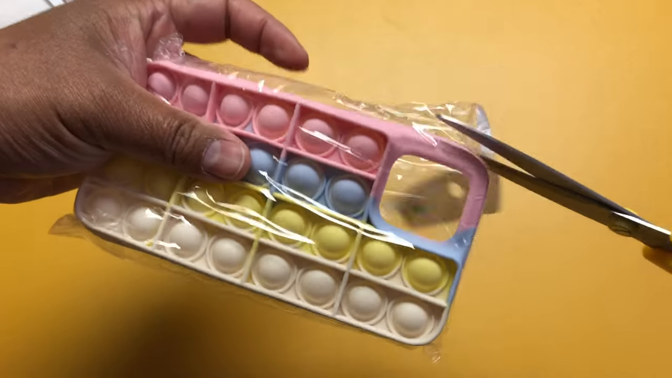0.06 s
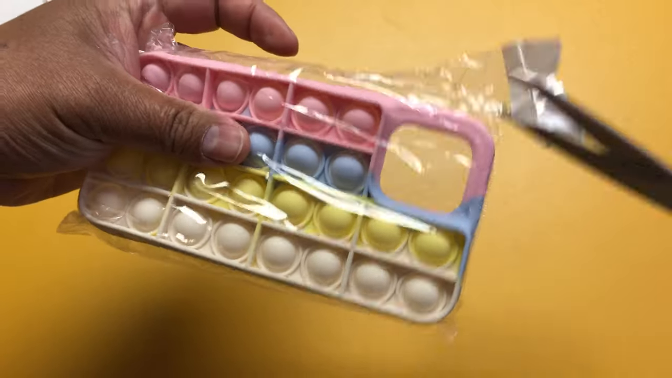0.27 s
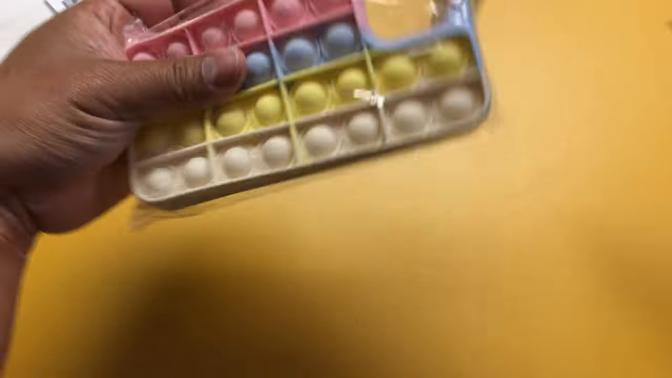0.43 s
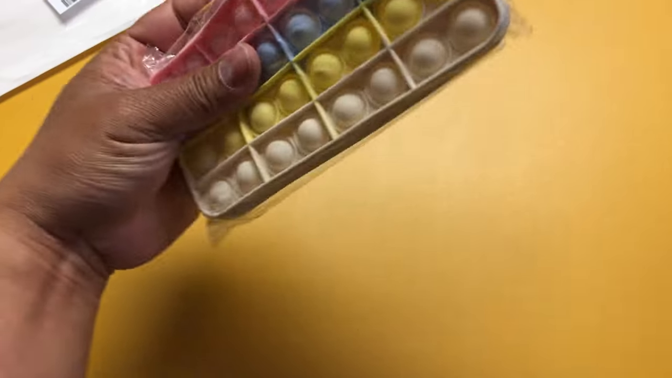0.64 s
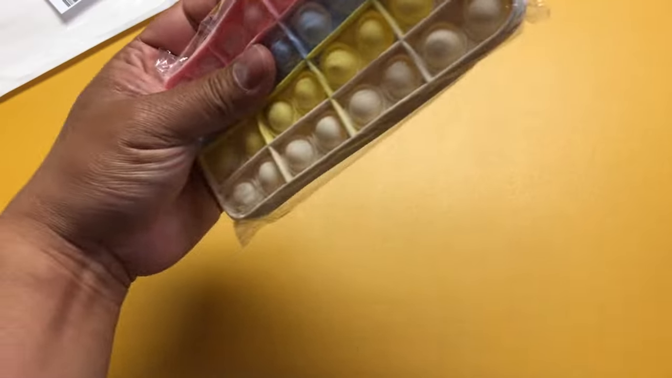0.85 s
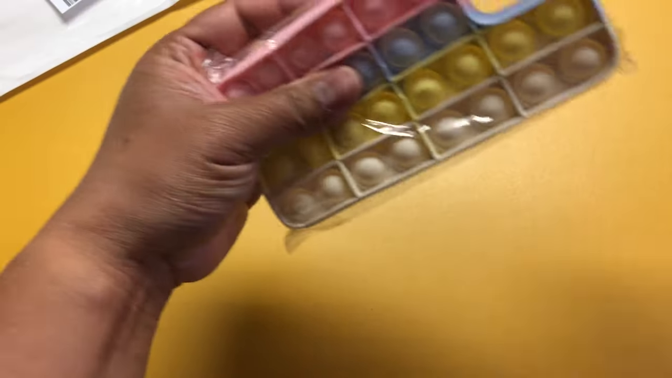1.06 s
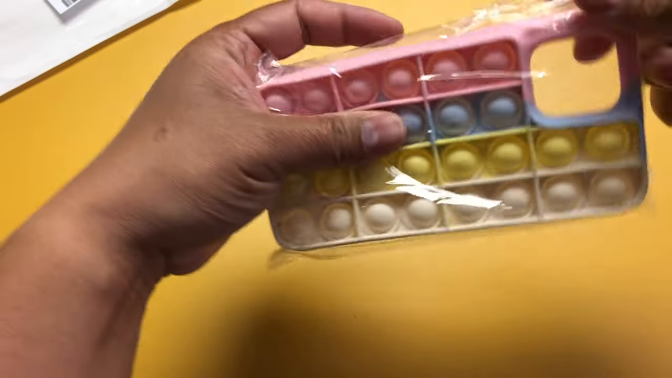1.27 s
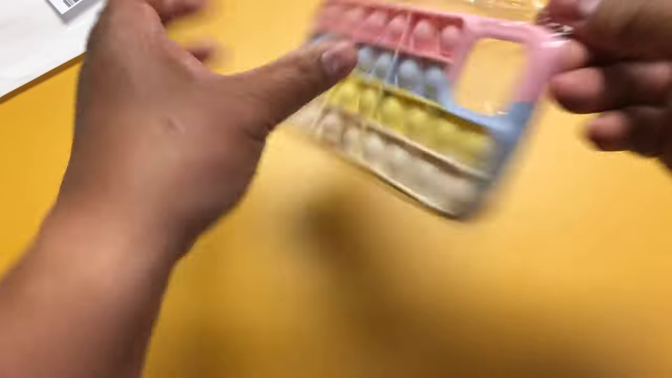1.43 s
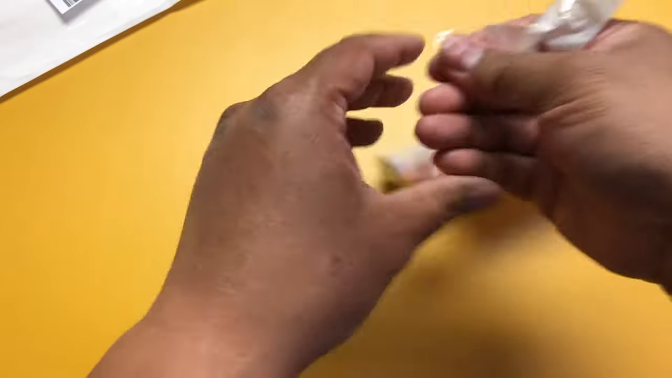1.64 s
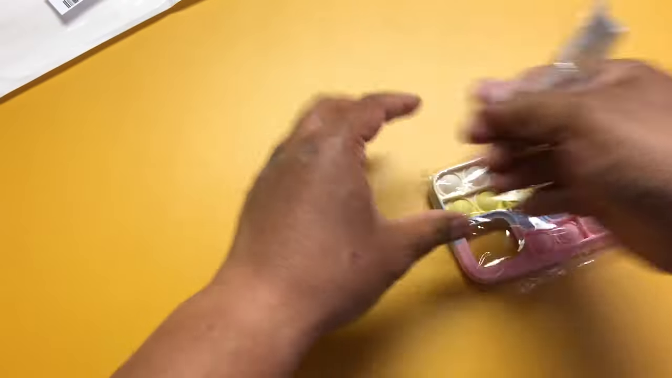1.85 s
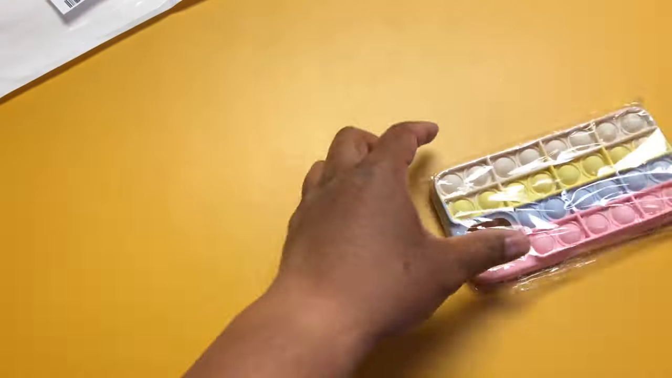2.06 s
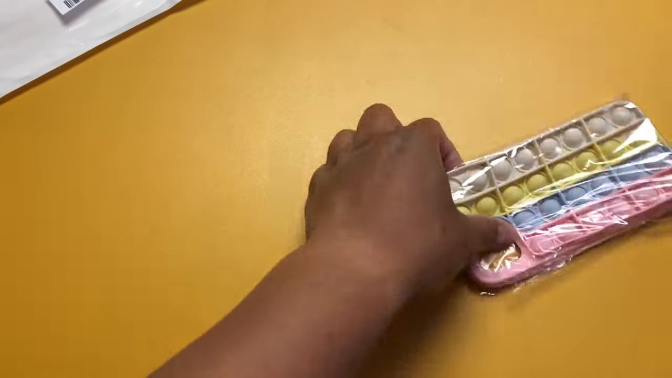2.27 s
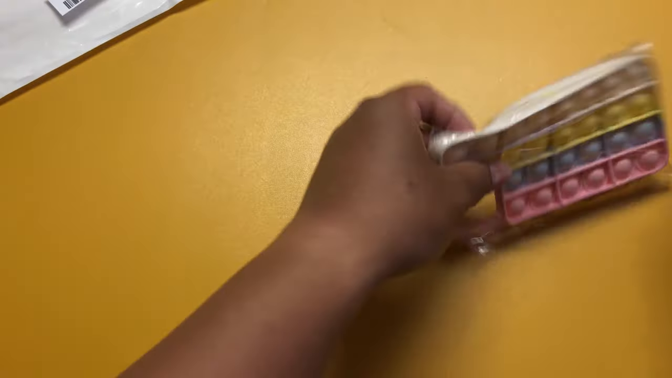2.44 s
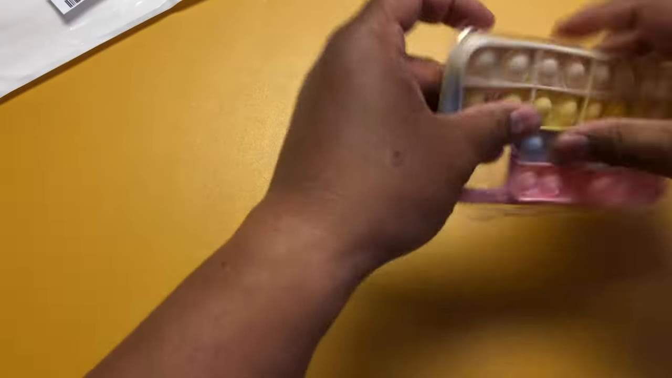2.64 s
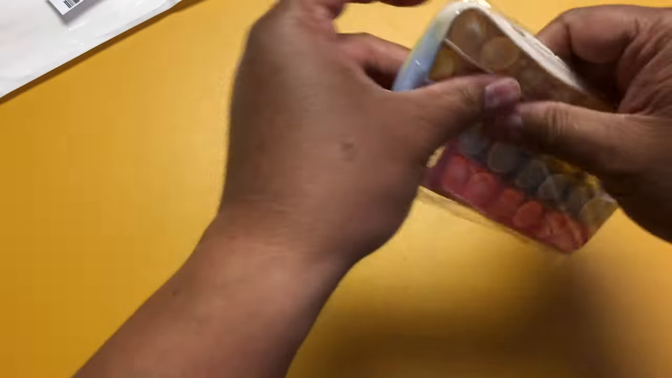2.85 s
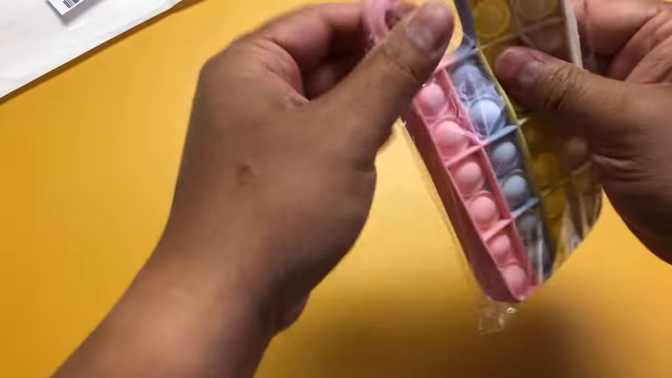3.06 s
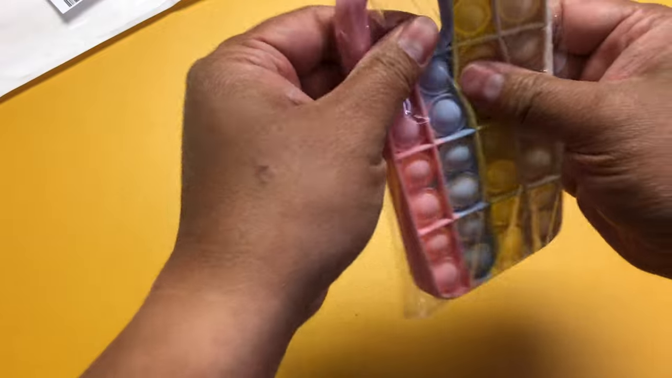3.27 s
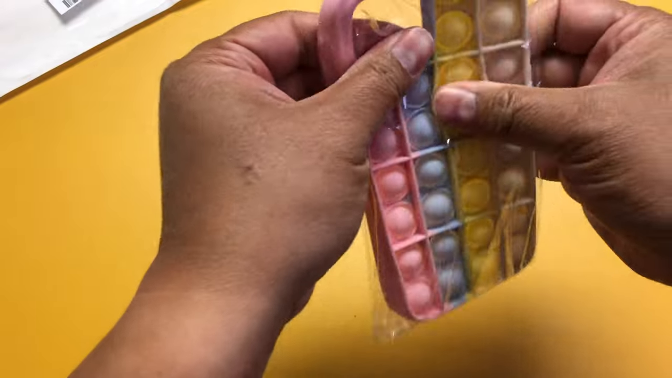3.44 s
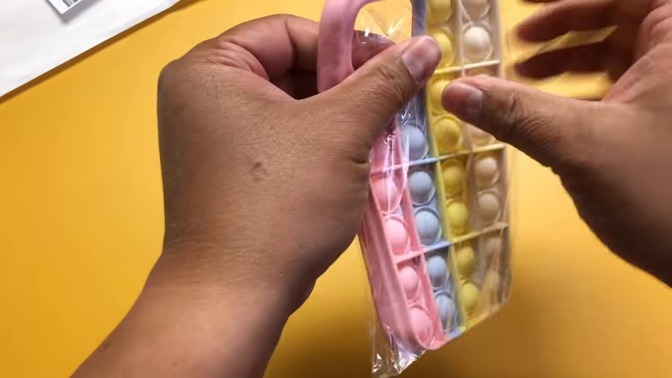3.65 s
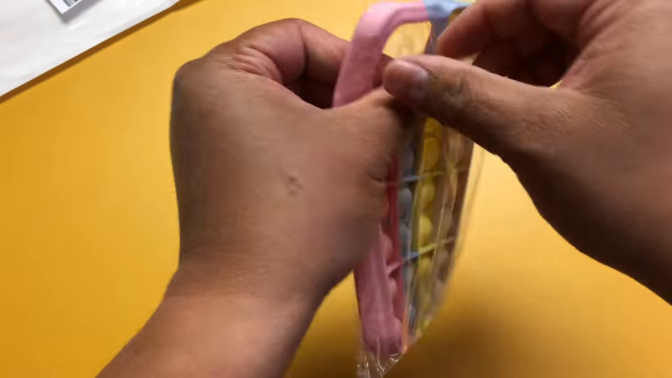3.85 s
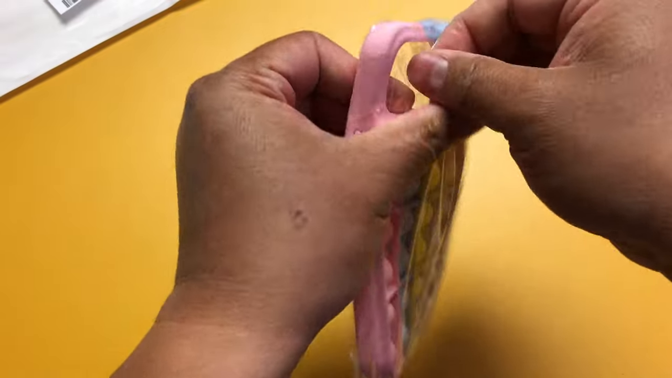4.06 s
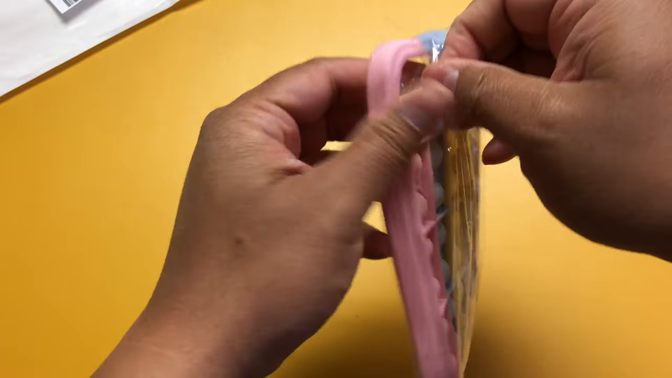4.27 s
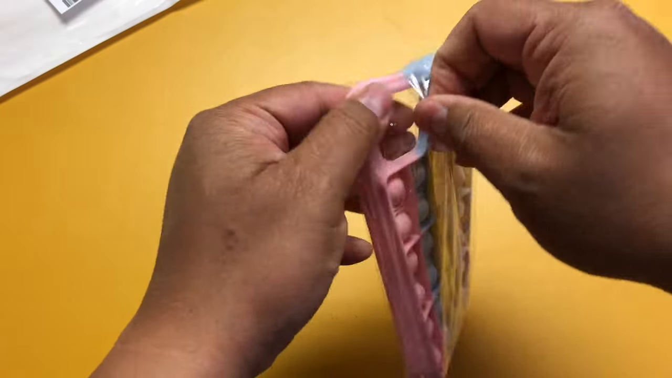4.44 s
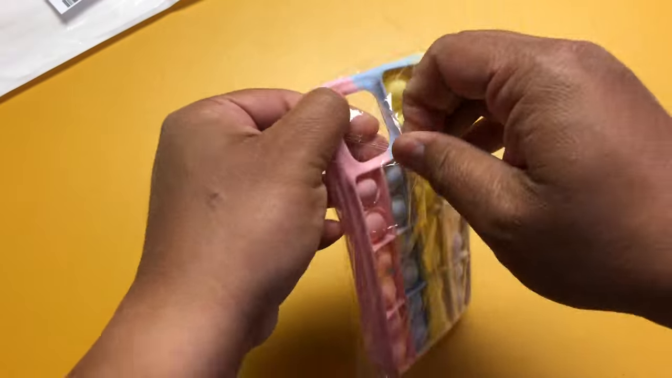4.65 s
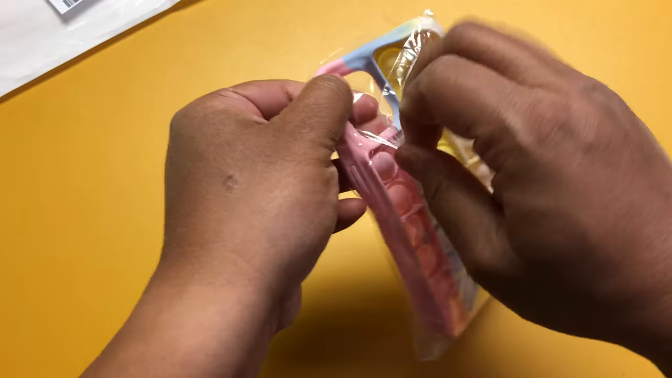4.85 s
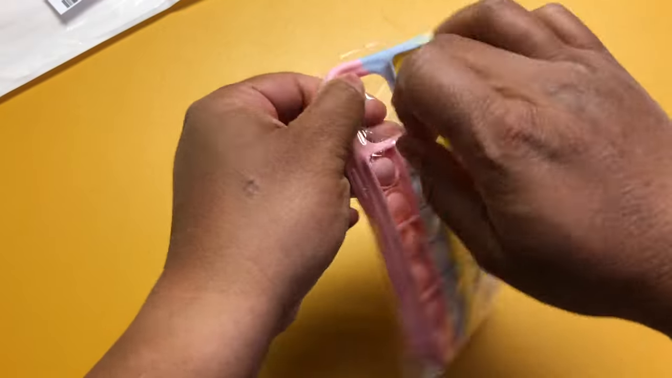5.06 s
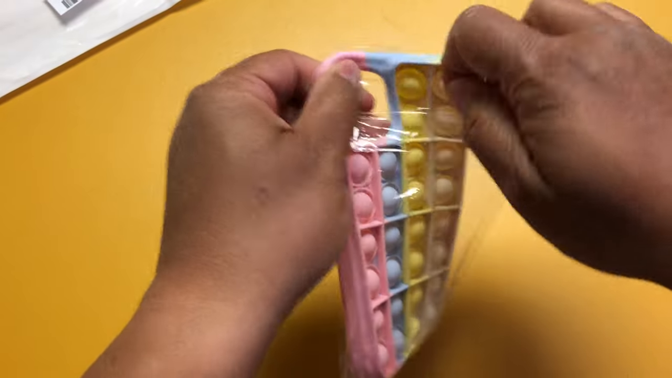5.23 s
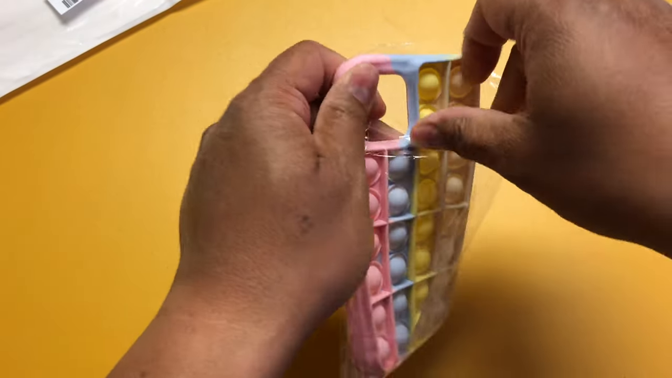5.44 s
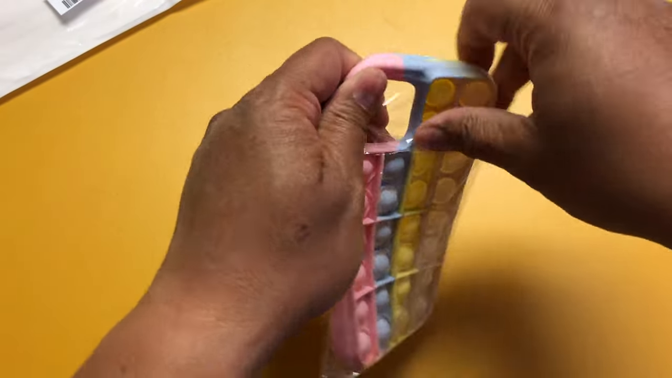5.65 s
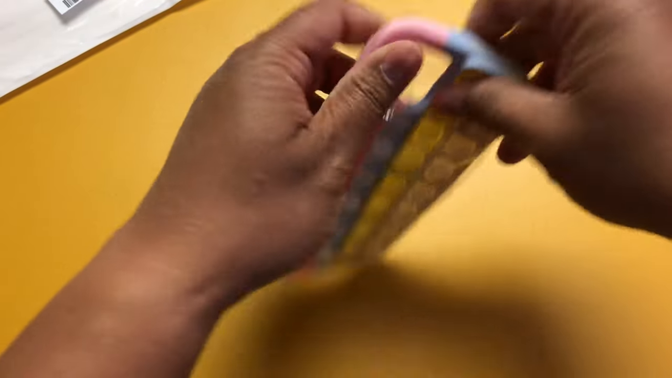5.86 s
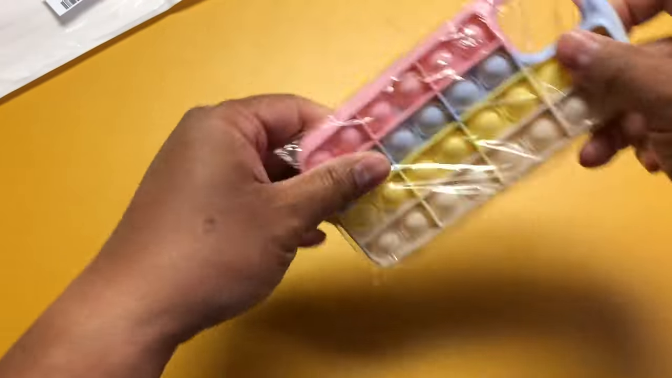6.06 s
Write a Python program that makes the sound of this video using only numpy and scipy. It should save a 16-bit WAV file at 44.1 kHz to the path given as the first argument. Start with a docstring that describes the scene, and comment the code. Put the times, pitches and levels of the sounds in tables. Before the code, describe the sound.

Thin plastic wrapping crackles in uneven bursts as a soft phone case is handled close to the microphone in a quiet room. Early on the case drops flat on a table with a hollow pop, and the rustle briefly eases. Then fingers squeeze and tug at the bag almost without pause, making crisp snaps mixed with light bumps over a faint low hum.

```python
"""Crinkling a plastic bag

Hands twist and tug a thin, stiff plastic bag around a soft rubber item, close to a microphone.
Each crease of the film buckles with a short snap; small snaps merge into crackle, large ones stand out.
The item knocks on a table top, trapping air where it lands flat, and thumps in the hands.
A quiet room hums behind."""
import sys
import numpy as np
from scipy import signal
from scipy.io import wavfile
from scipy.ndimage import uniform_filter1d

SR = 44100
rng = np.random.default_rng(int(sys.argv[2]) if len(sys.argv) > 2 else 0)


def bounce(signal):
    """Save signal as a 16-bit WAV file at the path given by the first command-line argument."""
    frames = np.transpose(np.atleast_2d(signal))
    limited = np.clip(frames, -1, 1)
    pcm = np.round(limited * 32767).astype(np.int16)
    wavfile.write(sys.argv[1], SR, pcm)


N = 269010

# Spectrum of the room noise: frequency_hz, gain_db
ROOM_SPECTRUM = [(24, -67), (40, 0.5), (94, 1), (230, 1), (440, -1), (595, -5.5), (1320, -8), (2130, -22),
                 (9770, -31.5), (15700, -29)]
# The item bumps the table or the hands: start_s, peak_db, hollow_pitch_hz, thud_db
BUMPS = [(0.063, -29, 410, -64), (0.115, -36.5, 417, -58), (0.223, -32.5, 1480, -66),
         (0.31, -36, 1580, -67), (0.533, -40.5, 392, -57), (0.6, -34, 1450, -38), (0.678, -35.5, 493, -38),
         (0.732, -44, 245, -49), (1.23, -46, 1580, -40.5), (1.577, -32, 560, -60), (1.639, -28, 547, -38.5),
         (1.69, -27, 337, -40), (1.718, -27.5, 422, -66), (2.036, -47, 237, -58), (2.151, -39, 1470, -47),
         (2.423, -29, 1330, -49), (2.778, -30, 1510, -70), (2.829, -35, 1000, -63), (2.973, -34, 930, -51),
         (3.219, -27.5, 1190, -61), (3.542, -29, 1030, -46), (3.75, -32, 1000, -48),
         (3.819, -27, 1110, -53),  (3.872, -32, 953, -57), (4.121, -30.5, 1030, -53),
         (4.337, -29, 1680, -46), (4.458, -30.5, 1440, -71), (4.519, -24, 1500, -67),
         (4.85, -24, 1440, -69), (4.863, -20, 1390, -65), (5.037, -31, 1440, -59),
         (5.119, -20.5, 1080, -40), (5.141, -25.5, 378, -37),  (5.359, -34, 393, -50),
         (5.484, -29.5, 975, -49), (5.539, -27, 1420, -43), (5.799, -43, 254, -52), (5.912, -31, 1480, -49),
         (5.974, -30.5, 1350, -42)]
# The item lands flat on trapped air, then rebounds: centre_s, level_db, pitch_hz, width_s
LANDINGS = [(1.6902, -1.5, 1315, 0.00078), (1.72, -22.5, 1310, 0.0017), (1.7505, -30, 1500, 0.00069)]
# Spectral envelope of a buckling crease: frequency_hz, gain_db
FILM_SPECTRUM = [(35, -85.5), (60, -20.5), (226, -3.5), (396, -4.5), (588, -10.5), (1030, -2.5),
                 (1890, -0.5), (4160, 3.5), (8570, 5.5), (11300, 2.5), (15700, -2.5)]
# The held bag, its idle crackle and the dull rustle under load: time_s, idle_db, dull_over_bright_db
GRIP = [(0, -48, -1.5), (.19, -56, 0.5), (.45, -47.5, -4.5), (.75, -55.5, 5), (.88, -57, -3),
        (1.139, -61, 3), (1.299, -32, -11), (1.6, -48, -7), (1.752, -39.5, 2.5), (1.86, -68.5, -4),
        (2.12, -57.5, 0.5), (2.25, -36.5, -9), (2.9, -35, -8.5), (3.08, -41.5, -4), (3.35, -33, -11.5),
        (3.72, -42, -6.5), (4.2, -36.5, -8.5), (4.65, -42.5, -7), (4.88, -38.5, -6.5), (4.97, -51.5, -9),
        (5.1, -34.5, -5.5), (5.45, -42, -1.5), (6.1, -36, -8.5)]
# Squeezes and tugs of the fingers: start_s, length_s, level_db
SQUEEZES = [(0.028, 0.065, -35.5), (0.106, 0.016, -35.5), (.22, 0.059, -46.5), (0.355, 0.052, -55.5),
            (.42, 0.13, -45), (0.6, 0.16, -49.5), (.93, 0.085, -47.5), (1.158, 0.099, -48),
            (1.219, .2, -31.5), (1.47, 0.042, -32.5), (1.542, 0.049, -30), (1.635, 0.017, -29),
            (1.681, 0.037, -33), (1.794, 0.059, -52.5), (2.132, .03, -38.5), (2.162, .1, -33.5),
            (2.32, 0.094, -34.5), (2.423, 0.031, -29.5), (2.489, 0.048, -32.5), (2.564, 0.14, -33),
            (2.703, 0.17, -34.5), (2.833, 0.096, -28), (2.934, 0.059, -30), (3.157, 0.081, -32.5),
            (3.333, 0.027, -37.5), (3.423, .12, -34.5), (3.614, 0.041, -40), (3.812, 0.047, -35),
            (3.862, 0.11, -33.5), (4.055, 0.14, -35.5), (4.22, .09, -41), (4.309, 0.048, -29.5),
            (4.412, 0.13, -34), (4.505, 0.054, -29), (4.578, 0.047, -35), (4.683, 0.091, -32.5),
            (4.81, 0.076, -33), (4.99, 0.13, -40), (5.063, 0.094, -29), (5.1, 0.033, -22),
            (5.13, 0.049, -30.5), (5.266, 0.1, -36.5), (5.397, 0.041, -38.5), (5.488, 0.082, -35.5),
            (5.588, 0.27, -37.5), (5.754, 0.083, -38.5), (5.873, 0.063, -35), (5.96, 0.074, -33)]
# Large creases, each ringing a panel of film: start_s, peak_db, panel_pitch_hz
LARGE_CREASES = [(0.014, -40, 7500), (0.0274, -24, 5120), (0.0378, -24, 7410), (0.0663, -12.5, 1600),
                 (0.09, -29, 4540), (0.1198, -10, 3500), (0.166, -29, 9640), (0.1745, -22.5, 5050),
                 (0.1855, -22, 4530), (0.2057, -18.5, 5560), (0.2252, -14.5, 3850), (0.242, -20, 1410),
                 (0.3022, -9.5, 6540), (0.3144, -13, 5710), (0.3416, -18, 6440), (0.3653, -27, 5400),
                 (0.3726, -18, 6450), (0.3927, -20, 11400), (0.4, -21, 7640), (0.426, -13, 7550),
                 (0.4404, -20, 7600), (0.4607, -21, 8770), (0.468, -18, 2480), (0.4826, -16, 5510),
                 (0.487, -16, 8140), (0.5013, -12.5, 7080), (0.5197, -17.5, 10100), (0.5306, -19, 4710),
                 (0.5364, -11.5, 6810), (0.5514, -15, 8780), (0.5726, -30, 6350), (0.5877, -26, 6000),
                 (0.598, -14.5, 2270), (0.6156, -26, 8820), (0.6338, -18.5, 6900), (0.6508, -19.5, 6420),
                 (0.6584, -19, 2980), (0.6774, -19.5, 2120), (0.705, -16, 10200), (0.726, -21, 7050),
                 (0.7328, -10.5, 2370), (0.7517, -27, 2950), (0.7678, -34, 5890), (0.7758, -24, 9120),
                 (0.7958, -13, 6060), (0.827, -24, 3000), (0.84, -22, 5610), (0.8684, -36, 5220),
                 (0.8852, -20.5, 1470), (0.9047, -24, 8620), (0.9315, -14, 6400), (0.9425, -11, 7500),
                 (0.9568, -17, 7290), (0.9681, -10, 6900), (0.9902, -25, 7800), (1.0064, -30, 9420),
                 (1.0151, -19.5, 5870), (1.036, -20, 4500), (1.0675, -22.5, 5500), (1.11, -22, 7240),
                 (1.129, -29, 5960), (1.1512, -30, 8390), (1.1724, -18.5, 4550), (1.2096, -27, 7250),
                 (1.229, -33, 5110), (1.2533, -15, 8810), (1.2992, -14.5, 9100), (1.3528, -13, 6500),
                 (1.4042, -13, 9200), (1.4792, -12.5, 9200), (1.5196, -22, 3900), (1.5356, -15, 9570),
                 (1.5513, -23, 9510), (1.638, -7, 4760), (1.6487, -8, 7800), (1.845, -29, 5920),
                 (1.914, -31.5, 5970), (1.9217, -36, 3030), (1.955, -36, 7840), (1.9732, -30, 2960),
                 (1.991, -31.5, 9330), (2.0322, -31, 6660), (2.0694, -35, 2810), (2.104, -31, 1730),
                 (2.1307, -31, 4670), (2.143, -17.5, 4200), (2.1516, -15, 7000), (2.1757, -12.5, 5710),
                 (2.2046, -11, 5280), (2.244, -19, 4770), (2.2546, -16, 3970), (2.3201, -15, 7120),
                 (2.35, -13, 9270), (2.3845, -12.5, 5500), (2.4202, -19, 6530), (2.4515, -9, 7030),
                 (2.5022, -14, 6960), (2.5126, -19, 4720), (2.5706, -31, 8950), (2.6454, -12, 6400),
                 (2.6974, -16.5, 7420), (2.7457, -30, 3430), (2.805, -21, 11400), (2.8457, -16.5, 7510),
                 (2.8618, -9, 4300), (2.877, -12, 9930), (2.897, -16, 8160), (2.978, -15, 6880),
                 (3.0331, -12, 9670), (3.0432, -15, 4720), (3.056, -25, 7000), (3.0634, -30, 7410),
                 (3.0894, -12.5, 5430), (3.1044, -23, 4280), (3.1186, -16, 8610), (3.133, -17, 4810),
                 (3.1454, -15, 6400), (3.1877, -12, 2380), (3.2376, -16, 8610), (3.2524, -8, 6430),
                 (3.26, -8, 8300), (3.2948, -16, 7380), (3.3107, -17, 8600), (3.3392, -16, 9250),
                 (3.3684, -8, 8300), (3.4005, -10, 4240), (3.4215, -12, 8270), (3.434, -9, 8400),
                 (3.4654, -16, 8290), (3.498, -18, 6230), (3.5143, -40, 4340), (3.527, -29, 7440),
                 (3.5389, -13.5, 5460), (3.5758, -12, 7000), (3.593, -14, 8080), (3.6187, -13, 4620),
                 (3.633, -24, 8330), (3.65, -14, 6820), (3.663, -16.5, 8290), (3.6728, -16, 8070),
                 (3.6908, -14, 8100), (3.7075, -19.5, 8230), (3.7206, -23, 4240), (3.7289, -13.5, 10800),
                 (3.7585, -11, 4350), (3.7887, -18, 8770), (3.8002, -11, 5240), (3.8242, -15.5, 6470),
                 (3.846, -16, 1410), (3.8763, -11.5, 3870), (3.903, -14, 8100), (3.9498, -15, 5450),
                 (4.0058, -24, 7190), (4.0404, -15, 4260), (4.0586, -26, 4800), (4.0778, -10, 8800),
                 (4.1063, -12, 9510), (4.122, -10, 10500), (4.153, -13.5, 5540), (4.1767, -20, 9650),
                 (4.188, -23, 3800), (4.1999, -12.5, 10300), (4.2464, -20, 6380), (4.289, -24, 2900),
                 (4.3066, -13, 3580), (4.3282, -6.5, 8000), (4.3434, -14.5, 2480), (4.375, -15, 7250),
                 (4.3855, -17.5, 1490), (4.4294, -19, 7350), (4.4536, -13, 3710), (4.4763, -18, 3740),
                 (4.5217, -7.5, 3600), (4.5714, -16, 4570), (4.588, -12, 4140), (4.668, -16, 7200),
                 (4.691, -15, 7350), (4.709, -14, 11000), (4.7391, -12, 7920), (4.802, -16.5, 1730),
                 (4.8244, -22.5, 5610), (4.8487, -16, 1420), (4.8689, -3.5, 1320), (4.9187, -19, 3500),
                 (4.9287, -24, 5600), (4.9564, -35, 2100), (4.999, -21, 4300), (5.028, -23, 4320),
                 (5.0539, -15, 4300), (5.0773, -24, 4170), (5.1108, -7.5, 3350), (5.1216, -4, 2530),
                 (5.139, -14, 6870), (5.1814, -27, 8520), (5.219, -19, 3340), (5.2324, -20, 8210),
                 (5.2688, -14.5, 2850), (5.302, -17, 3400), (5.3367, -17, 2150), (5.3647, -17.5, 3430),
                 (5.3744, -24, 1420), (5.3937, -23, 3320), (5.4075, -24, 3960), (5.4136, -17, 3400),
                 (5.437, -16, 5650), (5.4849, -15.5, 4670), (5.5089, -13, 4240), (5.5414, -26, 1430),
                 (5.6524, -25, 4180), (5.6785, -17, 8000), (5.7586, -13.5, 8640), (5.7877, -27, 4170),
                 (5.8845, -22, 9100), (5.973, -16.5, 3350), (5.9912, -13.5, 3130), (6.0068, -13.5, 8300),
                 (6.02, -30, 5570), (6.074, -27, 9710), (6.0854, -13.5, 4050), (1.6879, -8.5, 6800)]

ATTACK_S, RELEASE_DB_PER_S = 0.011, 691  # rise and fall of a squeeze
HARD_TUG_DB = -28.5  # crackle level of a hard tug


def gain_of(db):
    """Amplitude ratio of a level in decibels."""
    return 10 ** (np.asarray(db) / 20)


def butterworth(x, hz, kind, order=2):
    """Maximally flat low-pass or high-pass filtering."""
    return signal.sosfilt(signal.butter(order, hz, kind, fs=SR, output="sos"), x)


def impulse_response(spectrum, size=4096):
    """Minimum phase: the log magnitude sets the phase through the Hilbert transform."""
    hz, db = np.transpose(spectrum)
    bin_hz = abs(np.fft.fftfreq(size, 1 / SR))
    bin_db = np.interp(np.log(bin_hz + 1), np.log(hz + 1), db)
    log_response = np.conj(signal.hilbert(np.log(gain_of(bin_db))))
    return np.fft.ifft(np.exp(log_response)).real[:size // 2]


def resonate(x, hz, width_hz):
    """Forced response of a damped oscillator, with unit gain at resonance."""
    return signal.lfilter(*signal.iirpeak(hz, max(hz / width_hz, .3), SR), x)


def unit_rms(x, window_s):
    """Division by the running RMS holds the level near 1."""
    size = round(window_s * SR)
    power = uniform_filter1d(uniform_filter1d(x ** 2, size), size)
    return x / np.sqrt(abs(power) + 1e-20)


def room_hum(rms_db=-62):
    """Stationary filtered noise: the low hum of the room and faint microphone hiss."""
    noise = rng.standard_normal(N + 2048)
    hum = signal.oaconvolve(noise, impulse_response(ROOM_SPECTRUM), "valid")[:N]
    return gain_of(rms_db) * hum / hum.std()


def wall_reflections(x, t60_s=0.026, level_db=-20):
    """Diffuse reflection: near walls return a weak tail that decays exponentially."""
    t = np.arange(8000) / SR
    tail = rng.standard_normal(len(t)) * gain_of(-60 * t / t60_s) * (t > .004)
    return gain_of(level_db) * signal.oaconvolve(x, tail / np.linalg.norm(tail))[:N]


def item_bumps():
    """Impact excitation: a soft blow rings the hollow item, leaves a rough tail and shakes the table."""
    out, t = np.zeros(N), np.arange(6000) / SR
    for start_s, peak_db, hz, thud_db in BUMPS:
        noise = rng.standard_normal(len(t))
        cycles = t * hz
        blow = np.sin(2 * np.pi * cycles) * cycles * np.exp(-cycles / 1.4)
        tail = resonate(noise * gain_of(-60 * t / 0.14), hz, .5 * hz)
        tail += resonate(noise * gain_of(-60 * t / 0.046), 510, 220)
        knock = blow / abs(blow).max() + gain_of(-0.5) * tail / abs(tail).max()
        shake = gain_of(-60 * t / 0.038) + gain_of(-13.5 - 60 * t / 0.6)  # quick thump, slow wobble
        thud = resonate(resonate(noise * shake, 140, 180), 150, 220)
        add(out, start_s, gain_of(peak_db) * knock + gain_of(thud_db) * thud / abs(thud).max())
    return out


def air_pockets():
    """Cavity resonance: two modes swell and die as air is squeezed from under the landing item."""
    out, t = np.zeros(N), np.arange(-300, 900) / SR
    taper = signal.windows.tukey(len(t), .3)
    for centre_s, level_db, hz, width_s in LANDINGS:
        swell = np.exp(-abs(t) / width_s * np.where(t < 0, .8, 1.1))
        phase = -2 * np.pi * hz * t
        modes = np.sin(phase) + gain_of(-12) * np.sin(1.6 * phase)
        add(out, centre_s + t[0], gain_of(level_db) * swell * modes * taper)
    return out


def add(mix, start_s, sound):
    """Superposition: a sound adds to the mix from start_s on."""
    part = mix[round(start_s * SR):][:len(sound)]
    part += sound[:len(part)]


def hand_effort_db():
    """Incoherent addition: the powers of idle crackle and squeezes sum to the bright crackle's level."""
    t = np.arange(N) / SR
    time_s, idle_db, _ = np.transpose(GRIP)
    power = gain_of(2 * np.interp(t, time_s, idle_db))
    for start_s, length_s, level_db in SQUEEZES:
        age_s = t[:round((length_s + .1) * SR)]
        attack = np.minimum(age_s / ATTACK_S, 1)
        release_db = RELEASE_DB_PER_S * np.maximum(age_s - length_s, 0)
        add(power, start_s, (attack * gain_of(level_db - release_db)) ** 2)
    return 10 * np.log10(power)


def crease(impulses, noise, hz, echo_s, t60_s=0.0093):
    """Buckling: each impulse shivers through the film, rings one panel and reflects off the table."""
    click = noise * signal.lfilter([1], [1, -gain_of(-60 / (t60_s * SR))], impulses)
    ring_db = 6 - 2 * np.log2(hz / 5000)  # large, low panels ring more clearly
    click += gain_of(ring_db) * resonate(click, hz, .45 * hz)
    add(click, echo_s, gain_of(-10) * click)
    return click


def small_creases(effort_db, rate_per_s=1000, spread_db=3, clump_db=2, panels=16):
    """Shot noise: random buckles merge, at rate_per_s for an effort of -35 dB and faster above it."""
    clumps = unit_rms(uniform_filter1d(rng.standard_normal(N), 350), window_s=1)
    size_db = spread_db * np.minimum(rng.exponential(1, N), 3.6) + clump_db * clumps
    chance = gain_of(.25 * (effort_db + 35)) * rate_per_s / SR
    impulses = gain_of(size_db) * (rng.random(N) < chance)
    panel, noise = rng.integers(0, panels, N), rng.standard_normal((panels, N))
    pitch_hz, echo_s = np.geomspace(350, 12000, panels), rng.uniform(0.0011, 0.0044, panels)
    clicks = sum(crease(impulses * (panel == k), noise[k], pitch_hz[k], echo_s[k]) for k in range(panels))
    return signal.oaconvolve(clicks, impulse_response(FILM_SPECTRUM))[:N]


def crackle(effort_db, treble_hz=9800, loss_db_per_db=0.067):
    """Amplitude modulation: the hands set the levels of the small creases' bright and dull bands."""
    film = small_creases(effort_db)
    dull = butterworth(film, 1500, "low", order=1)
    bright = unit_rms(film - dull, window_s=0.07)
    treble_gain = gain_of(loss_db_per_db * np.minimum(effort_db - HARD_TUG_DB, 0))
    bright -= butterworth(bright, treble_hz, "high") * (1 - treble_gain)  # slack film sounds duller
    time_s, _, dull_db = np.transpose(GRIP)
    dull_gain = gain_of(np.interp(np.arange(N) / SR, time_s, dull_db))
    return gain_of(effort_db) * (bright + dull_gain * unit_rms(dull, window_s=0.05))


def middling_creases(effort_db, count=260, above_db=8, spread_db=3):
    """A random point process: rows like LARGE_CREASES, with peaks that follow the hands' effort."""
    moment, size, pitch = rng.random((count, 3)).T
    peak_db = effort_db[(moment * N).astype(int)] + above_db + spread_db * (2 * size - 1)
    return list(zip(moment * N / SR, peak_db, 2000 * 5.5 ** pitch))


def snaps(effort_db, slack_s=0.00083, taut_extra_s=0.0048):
    """Buckling avalanche: a crease sets off others along its fold, for longer under more tension."""
    out, t = np.zeros(N), np.arange(1024) / SR
    film_response = impulse_response(FILM_SPECTRUM)[:512]
    for start_s, peak_db, hz in middling_creases(effort_db) + list(LARGE_CREASES):
        noise, trigger, size = rng.standard_normal((3, len(t)))
        pull_db = effort_db[min(round((start_s + ATTACK_S) * SR), N - 1)]
        length_s = slack_s + taut_extra_s * min(gain_of(pull_db - HARD_TUG_DB), 1)
        followers = 0.37 * np.sqrt(length_s / 0.0032) * np.exp(-(t / length_s) ** 4)
        impulses = (trigger > 1.8) * abs(size) * followers
        impulses[0] = 1
        sharp_noise = np.sign(noise) * (0.91 + 0.24 * abs(noise))  # the first break never starts weak
        clicks = crease(impulses, sharp_noise, hz, echo_s=.0026, t60_s=.002 + 0.15 * length_s)
        snap = signal.oaconvolve(clicks, film_response)
        add(out, start_s, gain_of(peak_db) * snap / abs(snap).max())
    return out


def scene():
    """Superposition of direct sound, reflections and room noise at one microphone."""
    effort_db = hand_effort_db()
    direct = crackle(effort_db) + snaps(effort_db) + item_bumps() + air_pockets()
    return (direct + wall_reflections(direct) + room_hum())[None]


def record(dry):
    """Band limiting: the small microphone loses the deepest bass, the recorder the highest treble."""
    low_pass = signal.firwin(511, 15800, window=("kaiser", 9), fs=SR)
    return signal.oaconvolve(butterworth(dry, 38, "high"), low_pass[None], "same")


dry = scene()
out = record(dry)
bounce(out)
```